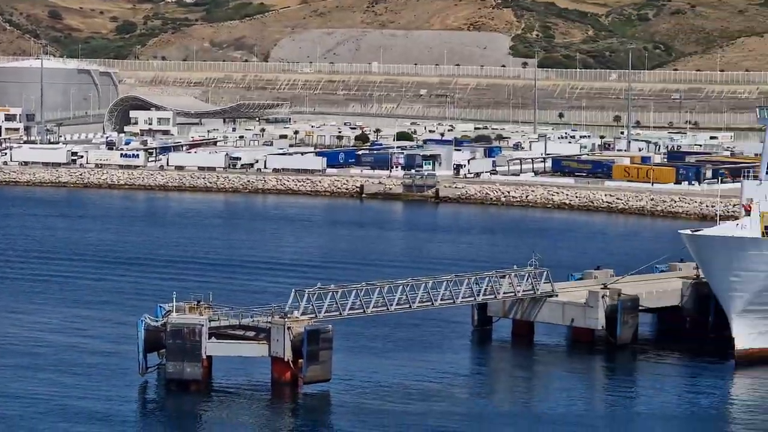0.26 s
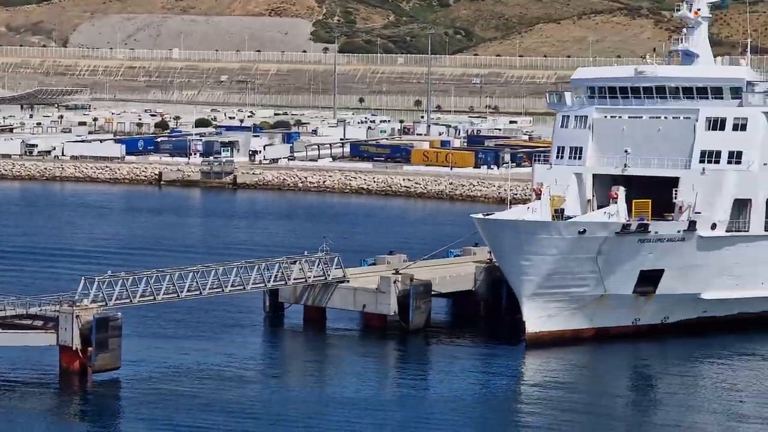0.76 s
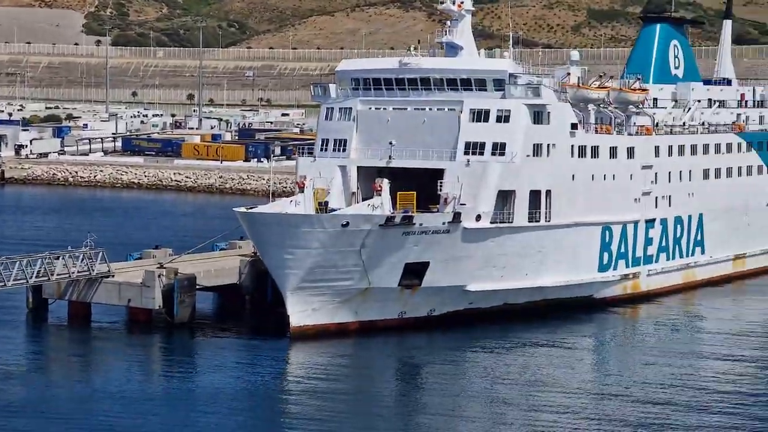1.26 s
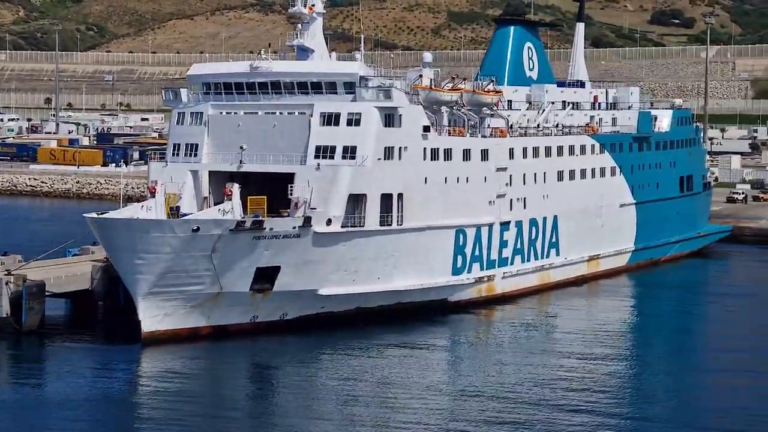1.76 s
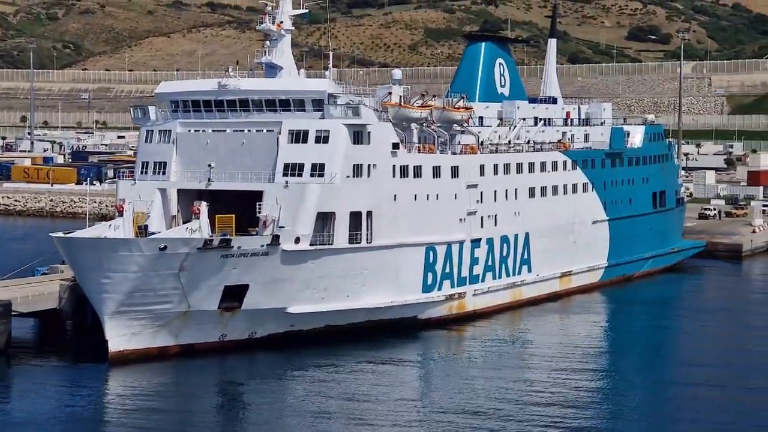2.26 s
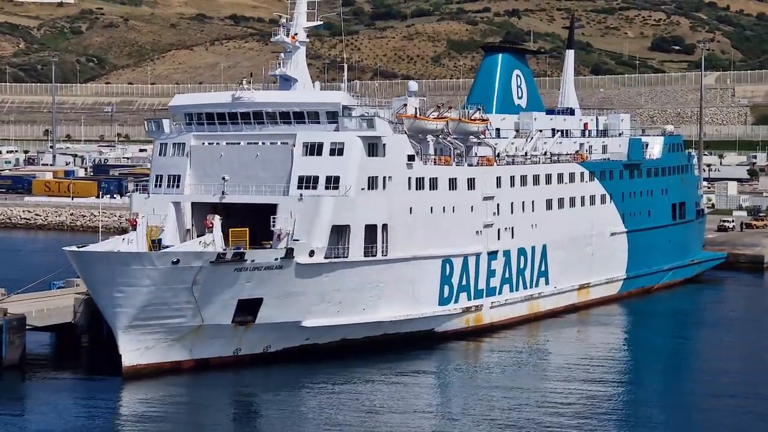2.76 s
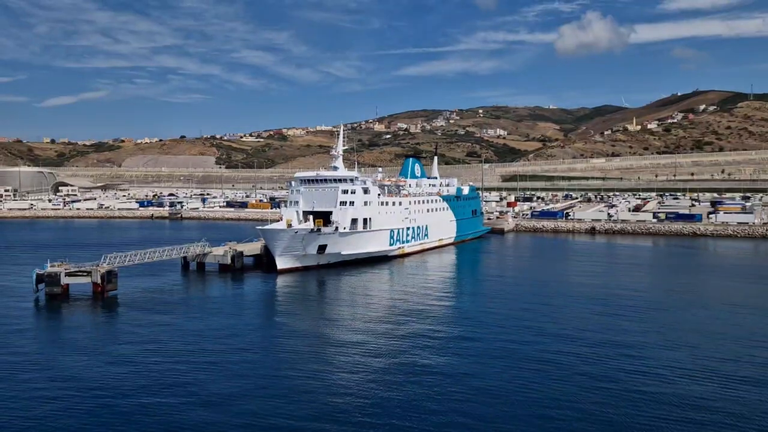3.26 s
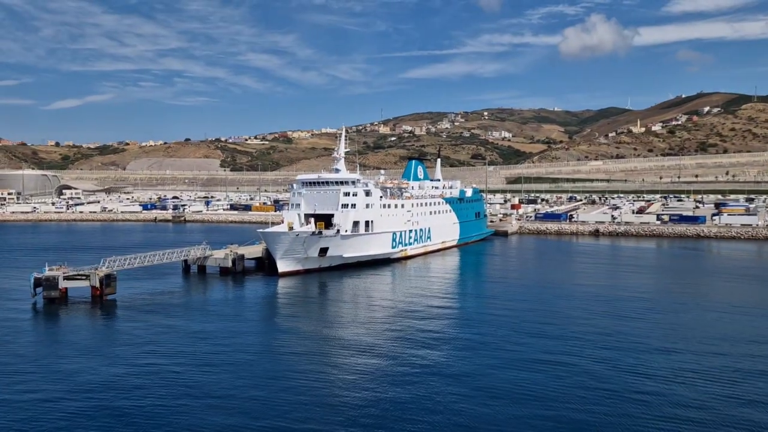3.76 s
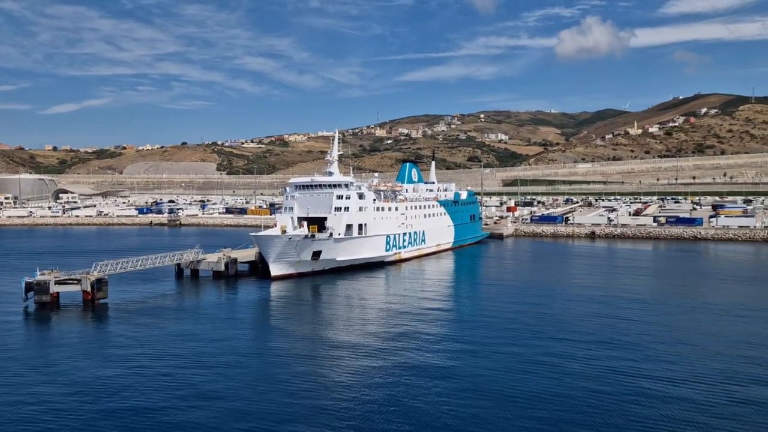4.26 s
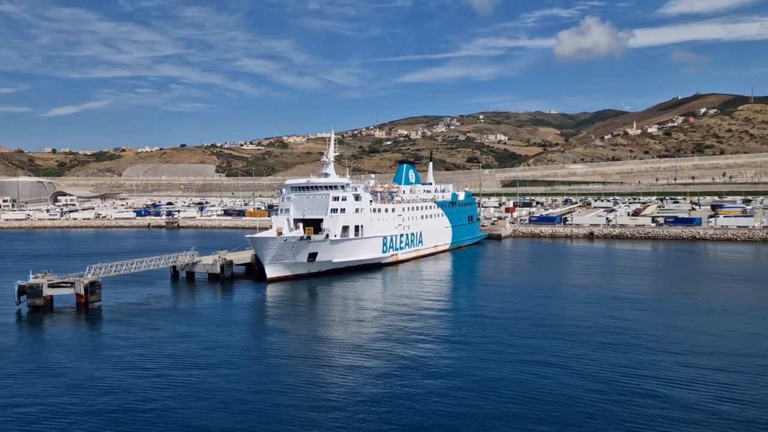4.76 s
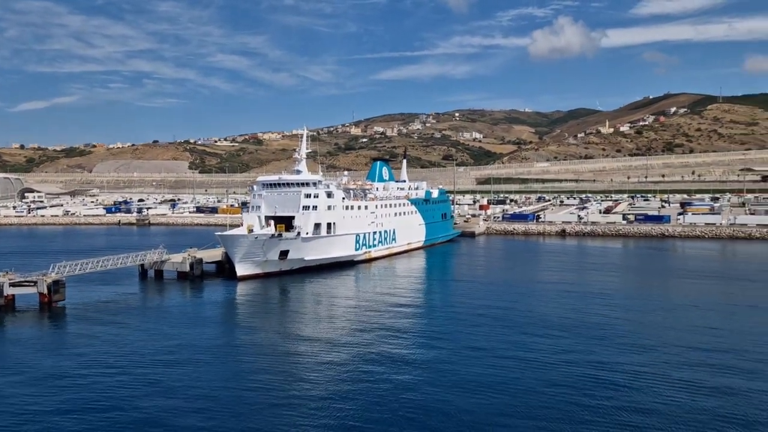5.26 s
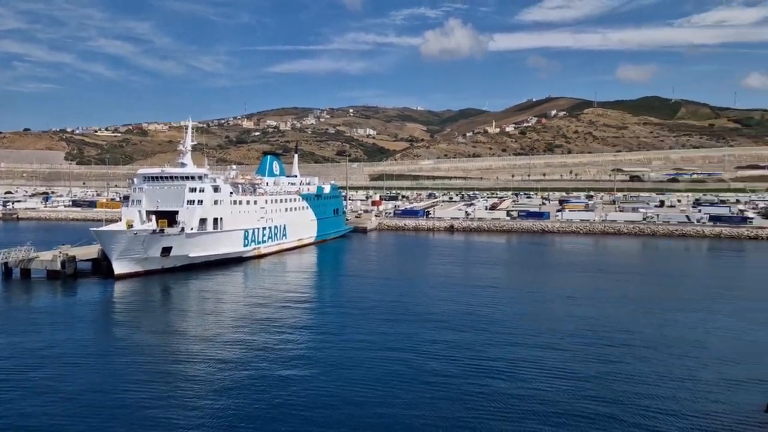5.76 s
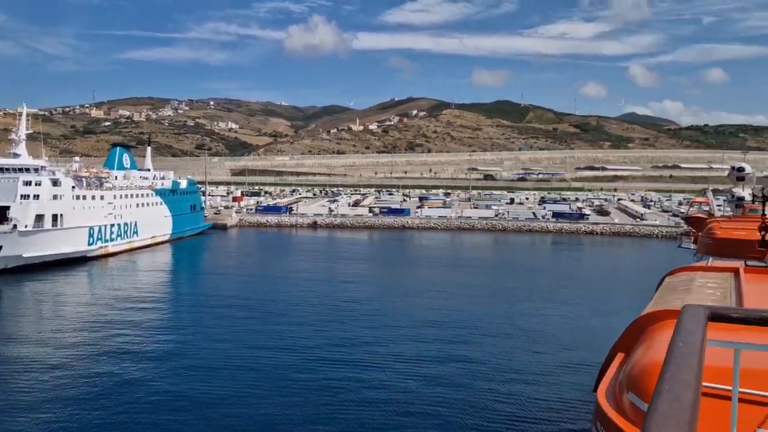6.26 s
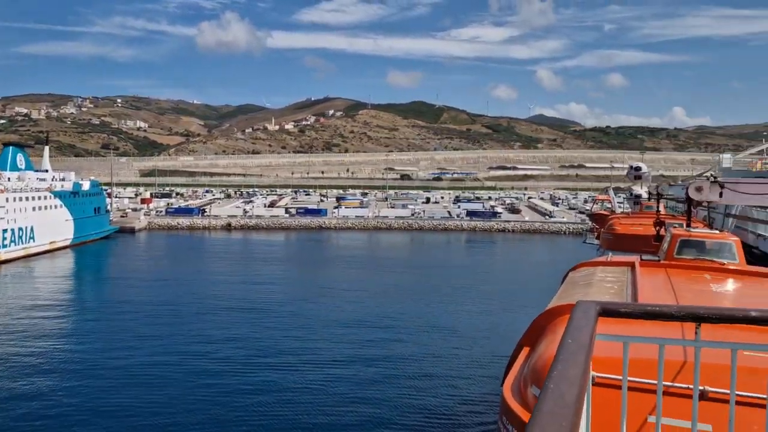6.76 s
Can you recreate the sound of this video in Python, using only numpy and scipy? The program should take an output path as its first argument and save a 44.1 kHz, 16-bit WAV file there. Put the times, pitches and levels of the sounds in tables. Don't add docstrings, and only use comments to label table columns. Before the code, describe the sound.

Seven seconds on an open ferry deck in harbour, through a slowly turning hand-held stereo phone. From 0 s, heavy low wind lumps press on the case, with a rougher edge at first, over a continuous deep diesel throb near 50 Hz. Exhaust roar and vent hiss rush steadily above, fluttering with the air. Brief gusts bump near 0.9 s and around 2 s, with a lull near 1.5 s. From about 2.7 to 3.3 s the pick-up widens and the upper engine tones soften; roar swells near 3 s and the air sounds brighter until 4 s. Bass bumps return around 4.4 and 4.9 s. Near 5.8 s the wind and roar dip while a band of vent hiss emerges, sliding downward. The roar recovers near 6.5 s, then its middle dulls until the cut at 7 s. Faint, thin fan whines persist throughout.

```python
import sys
import numpy as np
from scipy import signal
from scipy.io import wavfile
from scipy.ndimage import uniform_filter1d, minimum_filter1d

SR = 44100
rng = np.random.default_rng(int(sys.argv[2]) if len(sys.argv) > 2 else 0)


def boost(x):
    u = np.asarray(x, float) / 20
    return 10 ** u


def wav_record(signal):
    frames = np.transpose(np.atleast_2d(signal))
    bounded = np.clip(frames, -1, 1)
    quanta = np.round(bounded * 32767).astype(np.int16)
    wavfile.write(sys.argv[1], SR, quanta)


N = 309305
SIZE, HOP = 1024, 256
WIDEN_S, WIDEN_TAKES_S = 2.66, 0.6

# time in seconds, heading (0 ahead, 1 abeam, 2 astern),
# extra path to the left port in ms, focus as a factor on the likeness of the ports.
TURN = [(0, 0.36, 0, 1.3), (.9, 0.17, 0.024, 1.52), (1.3, 0.54, 0.0066, 1), (1.7, .9, 0.017, 0.92),
        (3, 1.01, 0, 1.2), (4.7, 1.26, 0.012, 0.9), (5.1, 1.18, 0.089, 1), (5.5, 1.53, 0.14, 1.1),
        (5.9, 1.98, 0.19, 1.2), (6.3, 1.84, 0.25, 1.3), (7.02, 1.5, 0.27, 2.5)]
# frequency in Hz, lag in radians.
PORT_LAG = [(30, 0.15), (150, 0.1), (300, .1)]
# centre in seconds, length in seconds, change in dB.
GUSTS = [(.08, 0.16, -10.5), (.94, 0.071, 6), (1.48, 0.13, -10), (1.77, 0.18, 2), (2.01, .14, 4),
         (2.22, .16, 1), (2.31, 0.12, -5), (2.48, .18, 3.5), (3.02, 0.33, 4), (3.24, .14, -5),
         (3.47, 0.69, 1), (4.38, 0.39, 3.5), (4.67, .2, 2.5), (4.95, .12, 7), (5.83, 0.2, -15),
         (6.6, 0.1, -1)]


def evened(x):
    return x / np.sqrt(np.mean(x ** 2) + 1e-20)


def read(points, hz):
    f, *columns = np.transpose(points)
    return np.array([np.interp(np.log(hz + 1), np.log(f + 1), c) for c in columns])


def follow(rows, t):
    s, *columns = np.transpose(rows)
    return [np.interp(t, s, c) for c in columns]


def bumps(rows, t):
    s, length, *columns = np.transpose(rows)
    arch = np.cos(np.pi * np.clip((t[:, None] - s) / length, -0.5, 0.5)) ** 2
    return [arch @ c for c in columns]


def drift(t, low_hz, top_hz, count=24):
    rates = np.geomspace(low_hz, top_hz, count)
    return evened(sum(np.sin(2 * np.pi * (f * t + rng.random())) for f in rates))


def bell(hz, centre_hz, width):
    return np.exp(-(np.log((hz + 1) / centre_hz) / width) ** 2)


def beam(t):
    return np.clip(1 - (t - WIDEN_S) / WIDEN_TAKES_S, 0, 1)


def pair(left, right, same, lag, size, hop):
    a, b, c, d = rng.standard_normal((*left.shape[::-1], 4)).T
    same = np.clip(same, 0, 1)
    shared, own = a + 1j * b, c + 1j * d
    left_bins = left * shared * np.exp(-1j * lag)
    right_bins = right * (same * shared + np.sqrt(1 - same ** 2) * own)
    noise = signal.istft(np.array([left_bins, right_bins]), nperseg=size, noverlap=size - hop)[1]
    return evened(noise[:, :N])


def fans():
    # pitch in Hz, level in dB rms.
    whines = [(319, -42), (485, -47.5), (3272, -67), (3375, -70), (3682, -64), (3883, -66), (4365, -67)]
    t = np.arange(N) / SR
    coarse, out = t[::HOP], np.zeros((2, N))
    delay = follow(TURN, t)[1] / 1000
    for hz, db in whines:
        pitch = hz * (1 + np.interp(t, coarse, 0.0006 * drift(coarse, 0.3, 6)))
        turn = 2 * np.pi * np.cumsum(pitch) / SR
        level = boost(db + np.interp(t, coarse, 2.5 * drift(coarse, 0.3, 4)))
        out += np.sqrt(2) * level * np.cos([turn - 2 * np.pi * hz * delay, turn])
    return out


def port_response(heading, hz):
    # frequency in Hz, left in dB, right in dB,
    # likeness of the ports from 0 to 1, radians by which the left trails.
    ahead = [(200, -2, -3, 1, 0.94), (402, -1, 0.5, 1, -1.7), (600, 0, 2.2, 0, -1.6),
             (1010, 2.5, -5, 0.9, 1), (1500, -1, 7.5, 0.4, -2.1), (2200, -0.5, 6.5, 0.7, -3),
             (3000, 5, -5.5, 0.85, -3), (3730, 0, -1, 0.7, -3), (4700, -0.5, 2.5, 1, -5),
             (5700, 3, -4, 0.08, -3.5), (7240, 4, 3.5, 0.4, -4.5), (8500, -3, -3.5, 0.05, -12),
             (10500, -0.5, 0, 0.06, 2.5), (14000, 0, -2.5, 0.05, -8.5)]
    abeam = [(199, -1, -0.5, 0.77, -0.56), (393, 3, -2, 1, 0.12), (600, 0.5, -2, 0.65, -0.53),
             (1000, 0.3, -0.6, 0.5, 0.5), (1410, 1.5, 1, 0.58, -0.2), (2280, -1, 0, 0.46, 0.06),
             (2970, -0.7, -3.5, 0, -0.1), (3780, -4, -6.5, 0.23, -1.5), (4700, 1, 3.5, 0.28, -2.3),
             (5970, -1.5, -1, 0.54, 1), (7000, 0.5, 1.8, 0.1, -0.1), (8500, -3.5, 1, 0.5, 0),
             (10500, 0.5, 2, 0.1, -4.5), (14000, 0.5, 1, 0.31, 0.2)]
    astern = [(195, -6, -9, 0.8, -0.1), (404, 3, -4.5, 0.9, -0.26), (597, 1, -4.5, 0.64, 0.6),
              (1000, 1.5, -2.5, 0.98, 0), (1550, 2.5, -4, 0.86, -0.14), (2200, 1.5, 3.5, 0.2, 0.2),
              (2900, 1.5, -5, 0.3, 1.6), (3820, 2.5, 4.5, 0.4, 1), (4800, -2.5, 4, 0.33, 0),
              (5630, 0.5, 2.5, 0.5, 0.2), (7100, -5.5, -2, 0, -0.3), (8500, -2, 3, 0.38, -0.5),
              (10500, 0.5, 1.5, 0.21, -2.3), (14000, -4, -2.5, 0.18, -1.5)]
    left_db = right_db = link = 0
    for k, table in enumerate([ahead, abeam, astern]):
        weight = np.maximum(1 - abs(np.clip(heading, 0, 2) - k), 0)
        left, right, same, lag = read(table, hz)[:, :, None]
        left_db, right_db = left_db + weight * left, right_db + weight * right
        link = link + weight * same * np.exp(1j * lag)
    return left_db, right_db, link


def roar_level(heading, hz, t):
    # frequency in Hz, level in dB per Hz.
    funnel = [(150, 4), (210, -3), (245, 5.5), (330, 1), (480, -9), (560, -11), (640, -13.5), (800, -10),
              (960, -14.5), (1150, -12), (1300, -14), (1550, -12), (2100, -18.5), (2500, -24)]
    # frequency in Hz, level in dB per Hz.
    vents = [(2500, -23.8), (3200, -21.5), (4000, -26), (5000, -28.5), (5700, -29), (6300, -33.5),
             (6800, -38), (7400, -32), (8200, -39.5), (9300, -42.5), (9900, -47.5), (11500, -50),
             (13500, -47.5), (15600, -46)]
    # centre in seconds, length in seconds, roar in dB, hiss in dB.
    swells = [(.25, 0.94, -0.1, 2), (1.5, 0.54, -1.1, -1.5), (2.35, 1.7, -1, -.3), (2.96, 0.52, 4.5, 1.5),
              (3.5, 2.3, 1, 1.5), (4, 0.59, 1.2, -0.7), (5.3, 0.49, 0.4, -2.5), (5.8, 0.92, -3, 0),
              (6.4, .4, 1, -1), (6.65, 0.17, 2.5, 1)]
    # centre in seconds, length in seconds, rise in dB.
    glimpse = [
        (5.8, 0.74, 3),
    ]
    roar_db, hiss_db = bumps(swells, t)
    flutter = drift(t, 3.5, 50)
    patches = rng.standard_normal((len(t), len(hz))).T
    patches = uniform_filter1d(patches, size=6, axis=0)
    patches = evened(uniform_filter1d(patches, size=20, axis=1))
    column = hz[:, None]
    high = np.clip(np.log((column + 1) / 2000) / 1.76, 0, 1)
    level_db = read(funnel + vents[1:], hz).T + (1 - high) * roar_db
    level_db += high * (hiss_db + 0.96 * flutter) + 0.75 * patches

    shadow_db = np.minimum(heading, 1) * (beam(t) * 3 - (1 - beam(t)))
    level_db += bell(column, 3100, 0.4) * shadow_db
    vent_hz = 5300 * 2 ** np.clip(-0.6 * (t - glimpse[0][0]), -1, 1)
    level_db += bell(column, vent_hz, 0.34) * bumps(glimpse, t)[0]
    airy = np.clip(np.minimum(t - 2.8, 4.03 - t) / 0.1, 0, 1)
    level_db += 3 * airy * np.clip(np.log2((column + 1) / 9900) + 1, 0, 1)
    level_db += bell(column, 1400, 0.55) * -10 * np.maximum(t - 6.57, 0)
    level_db -= np.maximum(150 - column, 0) * 0.5
    level_db[hz > 15700] = -150
    return level_db


def roar():
    hz, t = np.fft.rfftfreq(SIZE, 1 / SR), np.arange(N // HOP + 5) * HOP / SR
    heading, path_ms, focus = follow(TURN, t)
    left_db, right_db, link = port_response(heading, hz)
    level_db = roar_level(heading, hz, t)
    eddies = rng.standard_normal((len(t), len(hz), 2)).T
    eddies = uniform_filter1d(eddies, size=16, axis=1)
    eddies = 1.17 * evened(uniform_filter1d(eddies, size=90, axis=2))
    left = boost(level_db + left_db + eddies[0])
    right = boost(level_db + right_db + eddies[1])
    most_alike = np.maximum(abs(link) * (hz[:, None] < 1500), 0.77)
    same = np.minimum(focus * abs(link), most_alike)
    lag = np.angle(link) + 2 * np.pi * hz[:, None] * path_ms / 1000
    return boost(-25) * pair(left, right, same, lag, size=SIZE, hop=HOP)


def engine():
    # multiple of the cycle rate, level in dB rms.
    orders = [(5, -42), (7, -29), (8, -28), (10, -26), (11, -30), (12, -16), (14, -30), (18, -31),
              (21, -32), (24, -28), (28, -26), (30, -30), (36, -43), (42, -43), (44, -46)]
    cycle_hz = 4.188
    step = 8
    t = np.arange(N // step + 1) * step / SR
    coarse, out = t[::32], np.zeros((2, len(t)))
    wide_db = -3 - 0.5 * (t - WIDEN_S)
    throb_db = beam(t) * 2.5 + (1 - beam(t)) * wide_db
    throb_db += 0.3 * np.interp(t, coarse, bumps(GUSTS, coarse)[0])
    for k, db in orders:
        share = np.clip((k - 7.5) / 1.3, 0, 1)
        waver_db = np.interp(t, coarse, 1.5 * drift(coarse, 0.2, 2.5))
        start = rng.random()
        wander = np.interp(t, coarse, 0.03 * drift(coarse, 0.1, 1.5))
        turn = 2 * np.pi * (k * cycle_hz * t + start + wander)
        lag = read(PORT_LAG, k * cycle_hz)[0]
        level = boost(db + share * throb_db + waver_db)
        out += np.sqrt(2) * level * np.cos([turn - lag, turn])
    out = signal.resample_poly(out, step, 1, axis=1, padtype="line", window=("kaiser", 14))[:, :N]
    return out * boost(np.array([[1.2], [-1.2]]))


def buffet():
    # frequency in Hz, level in dB per Hz.
    lumps = [(12, -34.5), (22, 3), (34, 1), (64, 5), (85, -1), (138, -6), (165, -13.5), (215, -25),
             (300, -39)]
    # time in seconds, level in dB.
    wind = [(0, -9), (.5, -16), (.8, -18.5), (1.35, -9.5), (1.65, -15), (2.5, -12), (2.9, -15),
            (3.6, -17.5), (4.1, -16.5), (4.5, -18.5), (5.05, -21), (5.7, -17.5), (6.1, -18), (7.02, -21)]
    # centre in seconds, length in seconds, rise in dB.
    sharp = [
        (0, .8, 14),
        (1.8, 0.96, 8),
        (3, 1.8, -9.5),
        (4.5, 1., 5.5),
        (6.6, 0.87, -10),
    ]
    hz = np.fft.rfftfreq(4 * SIZE, 1 / SR)[:, None]
    frames, t = np.arange(N // SIZE + 5) * SIZE / SR, np.arange(0, N + HOP, HOP) / SR
    shape = boost(read(lumps, hz[:, 0])[0][:, None] - np.maximum(hz - 300, 0) * 0.36)
    sharp_db = bumps(sharp, frames)[0] - 0.4 * bumps(GUSTS, frames)[0]
    shape = shape * boost(np.clip((hz - 130) / 40, 0, 1) * sharp_db)
    lag = read(PORT_LAG, hz[:, 0]).T
    noise = pair(shape * boost(1.0), shape, 0.96 - hz / 1200, lag, size=4 * SIZE, hop=SIZE)
    strength_db = follow(wind, t)[0] + bumps(GUSTS, t)[0]
    return noise * boost(np.interp(np.arange(N) / SR, t, strength_db))


def scene():
    noise = roar() + buffet()
    dip_hz, width_hz, share = 201.7, 27, 0.63
    noise -= share * signal.lfilter(*signal.iirpeak(dip_hz, dip_hz / width_hz, SR), noise)
    return fans() + engine() + noise


def low_pass(x):
    return signal.sosfilt(signal.butter(12, 17060, fs=SR, output="sos"), x)


def record(dry):
    cut = signal.sosfiltfilt(signal.butter(3, 23, "high", fs=SR, output="sos"), dry)
    room = np.minimum(1, 0.99 / (abs(cut).max(0) + 1e-9))
    gain = uniform_filter1d(minimum_filter1d(room, size=601), size=601)
    return low_pass(cut * gain)


dry = scene()
out = record(dry)
wav_record(out)
```